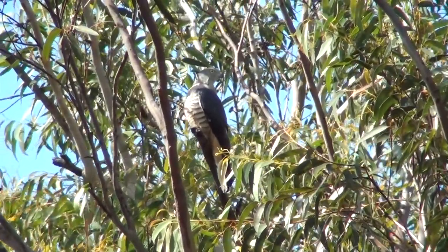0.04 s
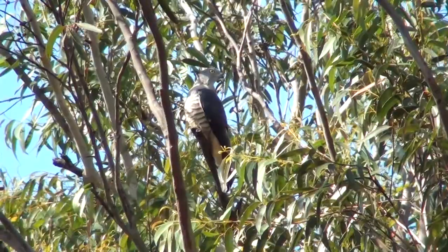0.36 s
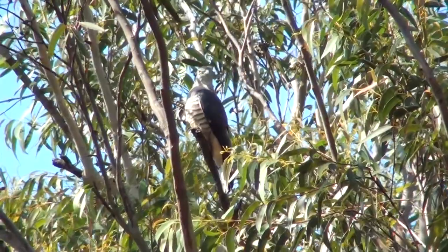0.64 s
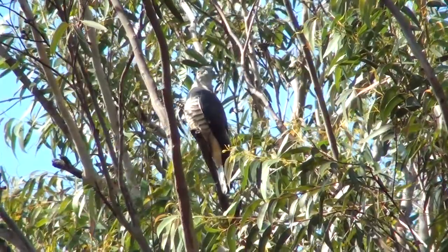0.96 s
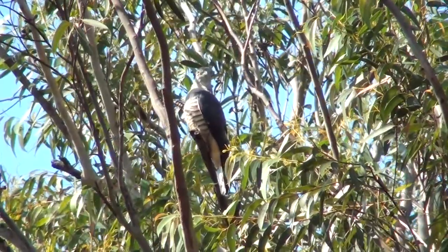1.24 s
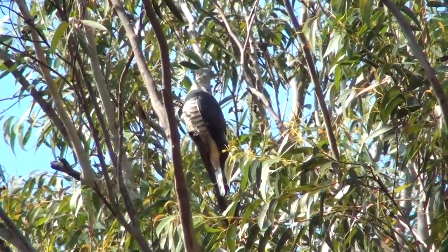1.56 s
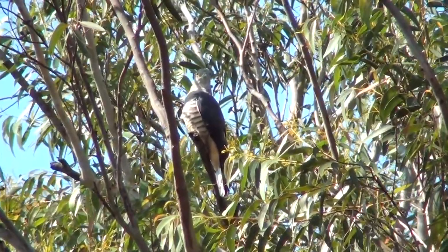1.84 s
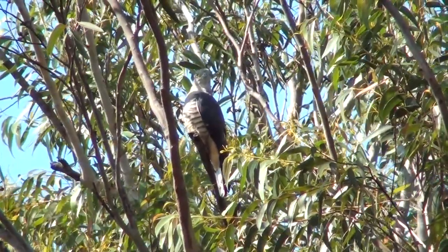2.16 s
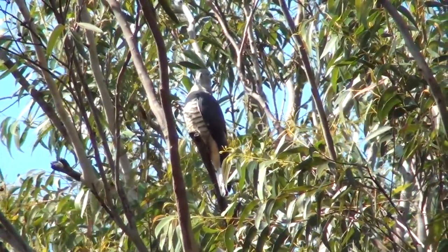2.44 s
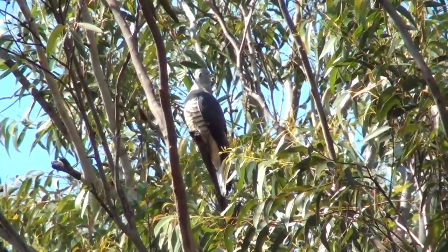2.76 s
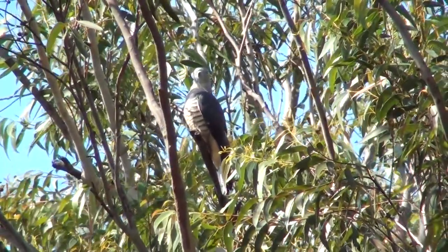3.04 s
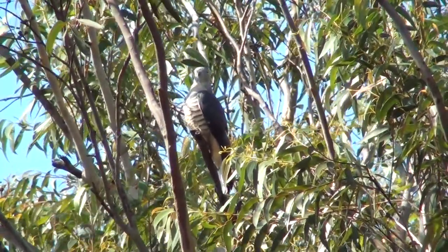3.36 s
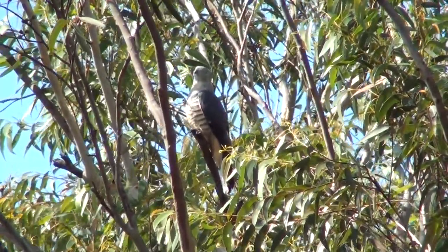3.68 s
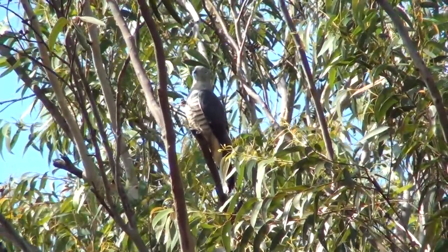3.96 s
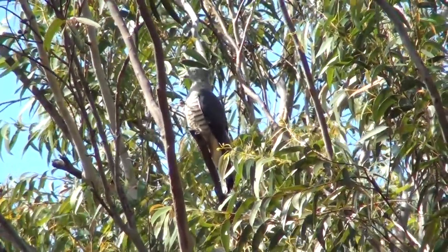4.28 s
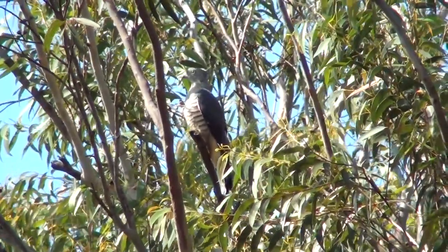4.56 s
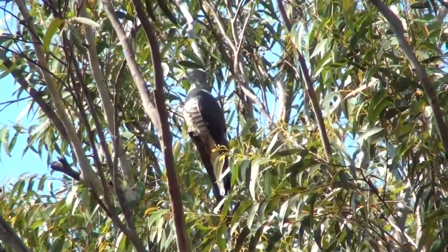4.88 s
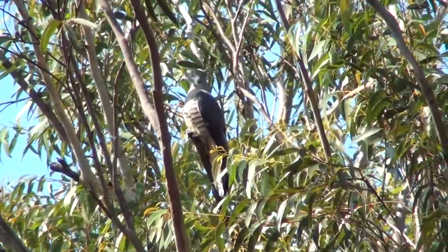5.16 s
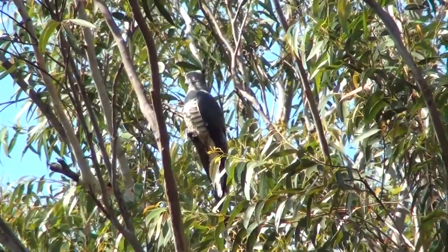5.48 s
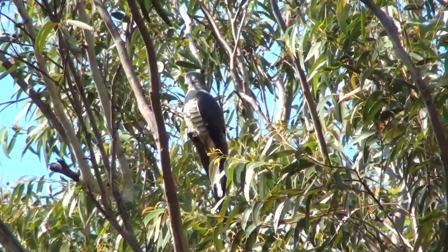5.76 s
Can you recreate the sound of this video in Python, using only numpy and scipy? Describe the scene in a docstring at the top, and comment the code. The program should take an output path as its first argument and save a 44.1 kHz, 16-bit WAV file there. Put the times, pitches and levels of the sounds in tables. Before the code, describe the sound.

Quiet woodland air rushes softly while a bird of prey, a little to the right, sounds a long, high, trembling whistle that dies down. Short, sharp swooping chirps follow, then one squawk and three lower squeals that climb in pitch. Faint distant squeals carry on to the end. Each call has a short woodland echo, and the camera whines and buzzes faintly at the microphone.

```python
"""A hawk in a gum tree

A hawk calls with its voice box: a long wavering whistle that fades, a run of short falling notes with
higher whistles over them, then a squawk and three rising squeals. Faint squeals come from farther off.
Trunks and leaves scatter every call. Underneath lie the low rush of woodland air, a distant rumble,
two faint hoots, and the quiet whine, lens buzz and ticking of a camera."""
import sys
import numpy as np
from scipy import signal
from scipy.fft import rfft, irfft, next_fast_len
from scipy.io import wavfile
from scipy.ndimage import uniform_filter1d, map_coordinates

SR = 44100
rng = np.random.default_rng(int(sys.argv[2]) if len(sys.argv) > 2 else 0)


def generate_wav(signal):
    """Clip the signal to [-1, 1] and save it as 16-bit WAV at the path in sys.argv[1]."""
    frames = np.transpose(np.atleast_2d(signal))
    scaled = np.clip(frames, -1, 1) * 32767
    pcm = np.round(scaled).astype(np.int16)
    wavfile.write(sys.argv[1], SR, pcm)


N = 265349


def amp(db):
    """Turn decibels into a number to multiply by."""
    return 10 ** (np.asarray(db) / 20)


def unit(x):
    """Scale a sound to an average strength (rms) of 1."""
    return x / np.sqrt(np.mean(x ** 2) + 1e-20)


def along(points, hz):
    """Read between (f/Hz, value) points, giving each octave equal room."""
    f, value = np.transpose(points)
    return np.interp(np.log(hz + 1), np.log(f + 1), value)


def curve(rows):
    """Join (t/s, value) points into one value per sample."""
    return np.interp(np.arange(N) / SR, *np.transpose(rows))


def wobble(per_s):
    """A smooth curve through per_s random values a second."""
    return map_coordinates(rng.standard_normal(4096), [np.arange(N) * per_s / SR], mode="wrap")


def filtered(x, response):
    """Multiply each frequency in x by response(hz)."""
    size = next_fast_len(N + SR // 2)
    return irfft(rfft(x, size) * response(np.fft.rfftfreq(size, 1 / SR)), size)[..., :N]


def noise_band(hz, width_hz):
    """Noise around one frequency: the narrower, the more like a tone."""
    return unit(filtered(rng.standard_normal(N), lambda f: np.exp(-((f - hz) / width_hz) ** 2)))


def add(track, s, sound):
    """Mix a sound into a track, s seconds in."""
    part = track[max(round(s * SR), 0):][:len(sound)]
    part += sound[:len(part)]


def air():
    """Distant air and leaves make a soft, swelling rush over an even hiss."""
    # tone colour of the air: f/Hz, relative level/dB
    colour = [(22, -24), (32, -11), (46, -8.5), (80, -5), (150, -2.5), (250, -3.5), (420, -7), (900, -7.5),
              (1400, -11.5), (2100, -15), (4000, -15.5), (6000, -17), (9000, -20.5), (15700, -21.5)]
    # strength of the low rush: t/s, level/dB
    swell = [(0, -55), (1, -51.5), (3.3, -52.5), (3.8, -48.5), (4.3, -51), (6, -53)]
    # how alike left and right are: f/Hz, likeness (1 = the same)
    likeness = [(60, .99), (125, 0.99), (250, 0.94), (500, 0.73), (1500, 0.55), (4000, 0.53), (8000, 0.9),
                (12000, 1)]

    def colour_and_width(hz):
        angle = np.arccos(np.clip(along(likeness, hz), -1, 1)) / 2
        return amp(along(colour, hz)) * [np.cos(angle), np.sin(angle)]

    mid, side = filtered(rng.standard_normal((2, N)), colour_and_width)
    noise = unit(np.array([mid + side, mid - side]))
    rush = filtered(noise, lambda hz: 1 / (1 + (hz / 2200) ** 4))
    hiss = noise - rush
    return rush * amp(curve(swell) + 2.5 + 0.39 * wobble(6.5)) + hiss * amp(-53)


def rumble():
    """A low rumble comes and goes far away."""
    # its strength: t/s, level/dB
    swell = [(0, -81), (1.2, -67), (2.3, -63), (2.7, -58.5), (3.2, -64), (3.6, -55.5), (4.1, -72.5),
             (6, -64.5)]
    return amp(curve(swell)) * noise_band(hz=82, width_hz=9)


def camera():
    """A camera whines steadily, and its lens motor buzzes once per picture."""
    # tones of the whine: f/Hz, level/dB
    whine = [(2520, -64), (14998, -84)]
    # where the motor rings: f/Hz, width/Hz, relative level/dB, share that pulses (0-1)
    rings = [(5260, 120, 1.5, 0.4), (6670, 20, -2, 0.8), (7580, 370, -3, 0.9)]
    # strength of the motor: t/s, level/dB
    motor_level = [(0, -74), (1, -70.5), (1.3, -65.5), (3.1, -66.5), (6, -71)]
    t = np.arange(N) / SR
    out = sum(np.sqrt(2) * amp(db) * np.sin(2 * np.pi * hz * t + .15 * wobble(20)) for hz, db in whine)
    pulses = np.exp(-(t * 25 % 1) / 0.35)  # 25 pictures a second
    for hz, width, db, pulsed in rings:
        drive = rng.standard_normal(N) * (1 + pulsed * (pulses - 1))
        ring = filtered(drive, lambda f: 1j * f * width / (hz * hz - f * f + 1j * f * width))
        out += amp(curve(motor_level) + db) * unit(ring)
    return out


def ticks():
    """The camera ticks twice: bursts of hiss a few milliseconds long."""
    # the ticks: t/s, f/Hz, width/Hz, level/dB
    bursts = [(.553, 7250, 3800, -50), (1.366, 5300, 970, -42)]
    out, t = np.zeros(N), np.arange(N) / SR
    for s, hz, width_hz, db in bursts:
        out += amp(db) * noise_band(hz, width_hz) * np.exp(-((t - s) / 0.0021) ** 2)
    return out


def voice_box(hz, gains, jitter, rasp, fade_s):
    """The bird's voice box vibrates a little unevenly; gains has a row per harmonic (pitch multiple)."""
    t = np.arange(len(hz)) / SR
    slow_shake = map_coordinates(rng.standard_normal(256), [t * 260], mode="wrap")
    fast_shake = map_coordinates(rng.standard_normal(1024), [t * 1500], mode="wrap")
    phase = 2 * np.pi * np.cumsum(hz * (1 + jitter * slow_shake + rasp * fast_shake)) / SR
    harmonic = np.arange(len(gains))[:, None] + 1
    fade = np.clip(np.minimum(t, t[-1] - t) / fade_s, 0, 1)
    return np.sqrt(2) * fade * np.sum(gains * np.sin(harmonic * phase), axis=0)


def whistles(notes, turn, swell_db, jitter, overtone_db):
    """Nearly pure notes that swell up to a turning point (turn, a share of their length), then fall."""
    # how the throat colours a whistle: f/Hz, gain/dB
    throat = [(3700, -0.5), (5200, -31), (6800, -19.5), (7500, -21.5), (9200, -39.5), (10600, -31.5),
              (11600, -45)]
    out = np.zeros(N)
    harmonic = np.arange(1, 5)[:, None]
    for s, length, start_hz, turn_hz, end_hz, db in notes:
        progress = np.linspace(0, 1, round(length * SR))
        opening = start_hz + (turn_hz - start_hz) * np.sin(np.pi / 2 * progress / turn)
        fall = end_hz + (turn_hz - end_hz) * np.cos(np.pi / 2 * (progress - turn) / (1 - turn)) ** 2
        hz = np.where(progress < turn, opening, fall)
        colour_db = along(throat, harmonic * hz) + overtone_db * (harmonic > 1)
        effort_db = db - swell_db * np.clip(1 - progress / turn, 0, 1)
        tremble = jitter * np.tanh(np.ptp(hz) / 250)  # wide swoops tremble more
        add(out, s, voice_box(hz, amp(effort_db + colour_db), tremble, rasp=0.0057, fade_s=0.0047))
    return out


def slides():
    """Whistles that sag a little, then slide down, open the long call."""
    # the whistles: t/s, length/s, starting f/Hz, fall/Hz, level/dB
    falling = [(0.569, .056, 2886, 11, -45), (0.666, 0.048, 3214, 370, -38.5),
               (0.734, 0.12, 3266, 245, -39.5), (0.81, 0.079, 3429, 480, -34.5),
               (.889, .13, 3497, 510, -36.5), (1.019, .143, 3517, 540, -35.5),
               (1.148, 0.09, 3563, 290, -34), (1.281, 0.09, 3550, 230, -35)]
    notes = [(s, length, hz, hz - 0.22 * fall, hz - fall, db) for s, length, hz, fall, db in falling]
    return whistles(notes, turn=.55, swell_db=4, jitter=0.009, overtone_db=3.5)


def trill(start_s=.688, period_s=.0922, note_s=.079, arch_hz=293):
    """The long, wavering whistle: evenly paced notes that each rise and fall."""
    # how hard the bird sings: t/s, level/dB
    effort = [(.69, -43), (1, -36), (1.3, -38.5), (1.6, -46), (2.45, -48.5)]
    beat = np.arange(20)
    times = start_s + period_s * beat
    offbeat = beat % 2  # every second note is lower and weaker
    flat_hz = 198 * np.exp(-(times - start_s) / 0.305)  # starts low, then settles
    tops = 3352 - 48.5 * offbeat - flat_hz
    levels = np.interp(times, *np.transpose(effort)) - 5.5 * offbeat
    notes = [(s, note_s, hz - arch_hz, hz, hz - arch_hz, db) for s, hz, db in zip(times, tops, levels)]
    return whistles(notes, turn=0.438, swell_db=0.5, jitter=0.012, overtone_db=3)


def hoots():
    """Two faint, blurred tones swell and fade in the distance."""
    # the tones: middle t/s, half length/s, f/Hz, level/dB
    tones = [(2.05, 0.27, 560, -63), (3.384, 0.15, 603, -64)]
    out, t = np.zeros(N), np.arange(N) / SR
    for s, half_length, hz, db in tones:
        out += amp(db) * noise_band(hz, width_hz=14) * np.exp(-((t - s) / half_length) ** 4)
    return out


def chirp_run():
    """Short chirps swoop up and fall, with higher, almost steady whistles over them."""
    # the chirps: t/s, length/s, top f/Hz, rise to the top/Hz, level/dB
    chirps = [(3.192, 0.064, 3474, 483, -35), (3.285, 0.064, 3414, 670, -26.5),
              (3.397, 0.061, 3364, 586, -26), (3.522, 0.072, 3404, 692, -26),
              (3.655, .057, 3412, 1002, -21.5), (3.782, .073, 3404, 599, -23.5),
              (3.926, 0.06, 3475, 660, -22)]
    # the higher whistles: t/s, length/s, top f/Hz, level/dB
    pips = [(3.085, 0.062, 3656, -42.5), (3.324, 0.041, 3525, -26), (3.482, 0.058, 3561, -27.5)]
    notes = [(s, length, hz - 109.5, hz, hz - 39.5, db) for s, length, hz, db in pips]
    loudest_db = max(row[-1] for row in chirps)
    for s, length, hz, rise_hz, db in chirps:
        fall_hz = 293 * amp(0.47 * (db - loudest_db))  # softer chirps fall less
        notes.append((s, length, hz - rise_hz, hz, hz - fall_hz, db))
    return whistles(notes, turn=0.436, swell_db=14.5, jitter=0.01, overtone_db=0)


def squeal(hz, db, bright_db, jitter):
    """A lower, reedy note, rich in overtones and coloured by the throat."""
    # harmonics as they leave the voice box, lowest first: level/dB
    reed = [-1, 1.5, -2, -0.5, -7.5, -14.5, -20, -22]
    # how the throat colours a squeal: f/Hz, gain/dB
    throat = [(1200, -11), (1900, -10), (2600, -3), (3300, -2), (5200, -0.5), (6500, -7.5), (7600, -9.5),
              (8400, -19), (10300, -13), (12000, -16), (15000, -27)]
    harmonic = np.arange(len(reed))[:, None] + 1
    upper = np.clip((harmonic * hz - 4000) / 700, 0, 1)  # a wide-open bill lets high overtones out
    # as the note mellows, its odd harmonics go first
    bill_db = upper * (bright_db + 0.45 * (harmonic % 2 - .5) * np.minimum(bright_db, 0))
    gains = amp(db + np.array(reed)[:, None] + along(throat, harmonic * hz) + bill_db)
    return voice_box(hz, gains, jitter, rasp=0.61 * jitter, fade_s=0.0016)


def glide(rows):
    """Pitch, level and brightness, moving smoothly through a few points in time."""
    times, *columns = np.transpose(rows)
    t = np.arange(times[0], times[-1], 1 / SR)
    return [uniform_filter1d(np.interp(t, times, column), size=300) for column in columns]


def far_squeals():
    """Faint squeals, coloured by their longer way through the wood."""
    # the calls: t/s, level/dB
    calls = [(3.43, -57), (3.71, -54.5), (4.794, -53.5), (5.166, -58.5), (5.505, -58), (5.85, -55.5)]
    # their shared shape: t/s from the start, f/Hz, relative level/dB, brightness/dB
    shape = [(0, 1398, -8.5, -14), (.02, 1444, -2, -9), (.07, 1480, -10, 3.5), (.1, 1727, -4.5, 0),
             (.135, 2040, -5, 0), (.165, 2000, -19, -12)]
    # colour of the farther calls: f/Hz, gain/dB
    colour = [(1500, 2.5), (2000, 15), (2800, 4.5), (4000, 5.5), (7000, 2.5)]
    out = np.zeros(N)
    for s, db in calls:
        add(out, s, amp(db) * squeal(*glide(shape), jitter=0.0032))
    return filtered(out, lambda hz: amp(along(colour, hz)))


def squawk():
    """The voice breaks downward once."""
    # course of the squawk: t/s, f/Hz, level/dB, brightness/dB
    shape = [(3.848, 2930, -48, -21), (3.859, 2590, -23.5, -17), (3.88, 2543, -25.5, -11.5),
             (3.895, 2384, -31, -7), (3.914, 2110, -46, 5)]
    out = np.zeros(N)
    add(out, shape[0][0], squeal(*glide(shape), jitter=0.0048))
    return out


def rising_squeals(climb_start_s=.045, attack_s=.018, release_s=.013, sag_hz_per_s=860):
    """Three near squeals: each flicks up in pitch, then wavers upward as it swells and mellows."""
    # the squeals: t/s, length/s, low f/Hz, top f/Hz, time to top/s, level/dB, first and last brightness/dB
    calls = [(4.005, 0.17, 1859, 2030, .098, -34.5, 2, -6), (4.177, 0.2, 1466, 1942, .19, -33, 4, 3.5),
             (4.494, .203, 1465, 1980, .185, -32.5, 5.5, 4)]
    # the opening flick: t/s from the start, share of the climb
    flick = [(0, -.6), (.016, .2), (.026, .22), (.043, -.03), (.055, 0)]
    out = np.zeros(N)
    for s, length, low_hz, top_hz, top_s, db, first_db, last_db in calls:
        t = np.arange(round(length * SR)) / SR
        climb = np.clip((t - climb_start_s) / (top_s - climb_start_s), 0, 1)
        bend = uniform_filter1d(climb + np.interp(t, *np.transpose(flick)), size=300)
        hz = low_hz + (top_hz - low_hz) * bend + 14.4 * wobble(60)[:len(t)]
        hz -= sag_hz_per_s * np.maximum(t - top_s, 0)
        # both ends of the note are weaker and duller
        edge = 1 - np.clip(np.minimum(t / attack_s, (length - t) / release_s), 0, 1)
        level_db = db + 4 * climb - 12 * edge + 2 * wobble(60)[:len(t)]
        bright_db = first_db + (last_db - first_db) * climb - 26 * edge
        add(out, s, squeal(hz, level_db, bright_db, jitter=0.0044))
    return out


def woodland(call, direct_db, leaves_db, trunks_db, side_db):
    """A call arrives directly, as quick echoes off leaves, and as a longer echo off trunks, in stereo."""
    # how long the trunks echo: f/Hz, time to fade by 60 dB/s
    fade_times = [(1500, 0.67), (3300, 0.56), (6000, 0.68), (12000, 0.62)]
    hz, slice_s, spectrum = signal.stft(rng.standard_normal((2, SR)), SR, nperseg=256)
    decay = amp(-60 * slice_s / along(fade_times, hz)[:, None])
    trunks = signal.istft(spectrum * decay, SR, nperseg=256)[1][:, :SR]
    t = np.arange(SR) / SR
    trunks *= 1 - np.exp(-t / 0.018)  # echoes take a moment to build
    leaves = rng.standard_normal((2, SR)) * amp(-60 * t / 0.12) * (1 - np.exp(-t / 0.002))
    echo = (amp(trunks_db) * unit(trunks) + amp(leaves_db) * unit(leaves)) / np.sqrt(SR)
    mid, side = signal.fftconvolve(call[None], echo, axes=1)[:, :N]
    direct = filtered(call, lambda f: 1 / (1 + (f / 8500) ** 4))  # leaves block the highest sounds
    return amp(direct_db) * direct + mid + amp(side_db) * np.array([side, -side])


def scene():
    """The calls come from a little right of centre, over the quiet background."""
    near = squawk() + rising_squeals()
    far = far_squeals()
    long_whistle = trill() + slides()
    run = chirp_run()
    calls = woodland(long_whistle, direct_db=-4, leaves_db=-3.5, trunks_db=-4.5, side_db=-8.5)
    calls += woodland(run, direct_db=-2.5, leaves_db=-2.5, trunks_db=-6, side_db=-10)
    calls += woodland(near, direct_db=-4.5, leaves_db=-4.5, trunks_db=-8.5, side_db=-12)
    calls += woodland(far, direct_db=-5.5, leaves_db=-4, trunks_db=-1.2, side_db=-9.5)
    return calls * amp([[-1.2], [1.2]]) + air() + rumble() + camera() + ticks() + hoots()


def record(dry):
    """The camera keeps nothing above 15900 Hz."""
    return filtered(dry, lambda hz: hz < 15900)


dry = scene()
out = record(dry)
generate_wav(out)
```